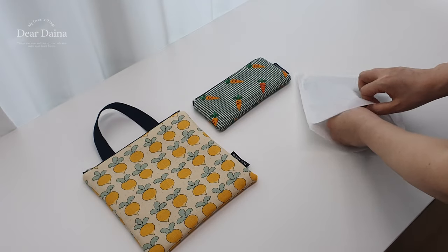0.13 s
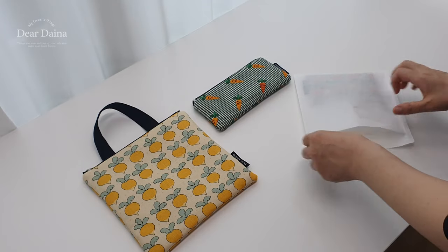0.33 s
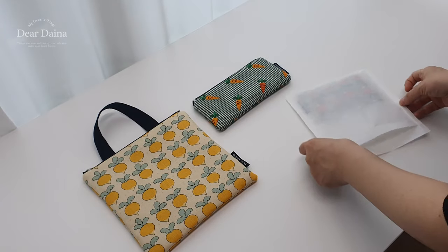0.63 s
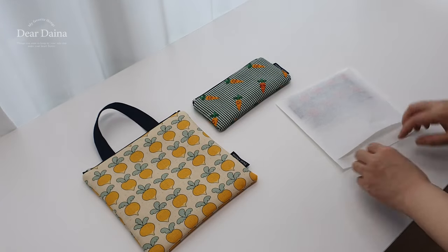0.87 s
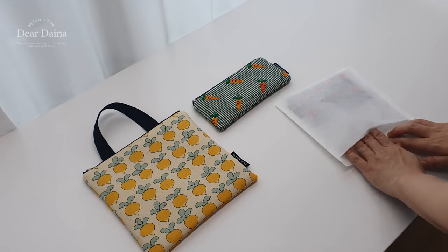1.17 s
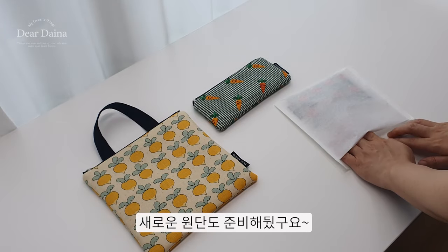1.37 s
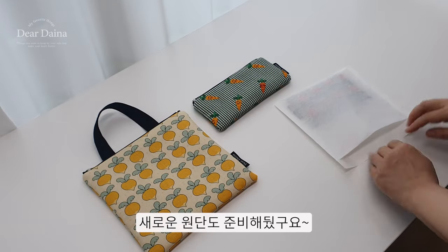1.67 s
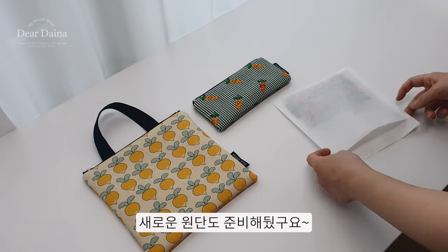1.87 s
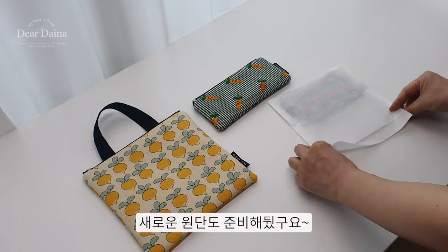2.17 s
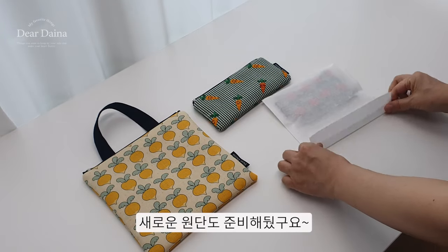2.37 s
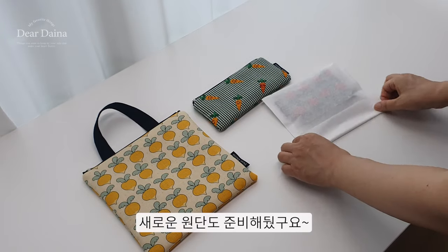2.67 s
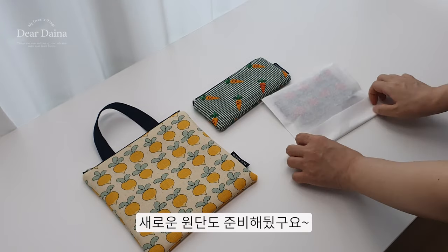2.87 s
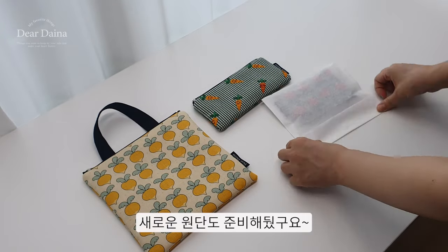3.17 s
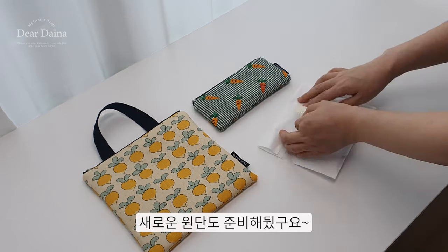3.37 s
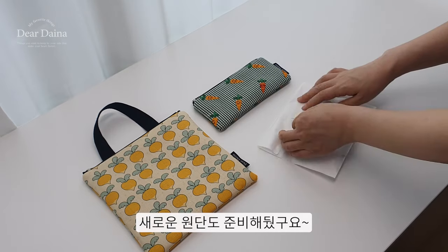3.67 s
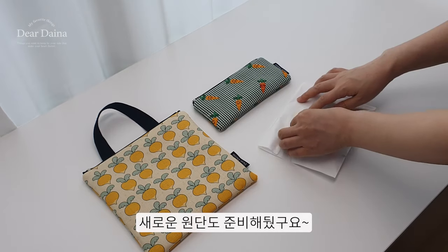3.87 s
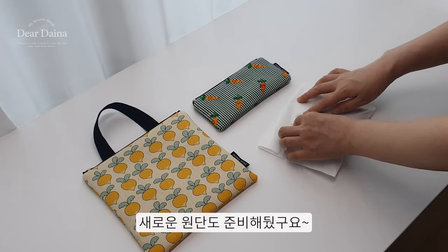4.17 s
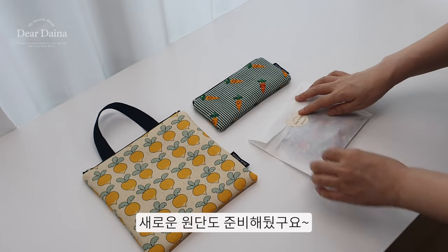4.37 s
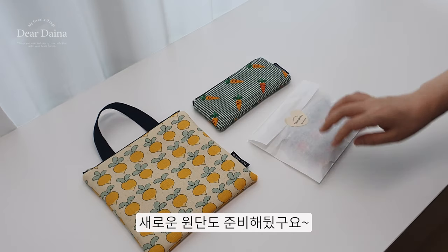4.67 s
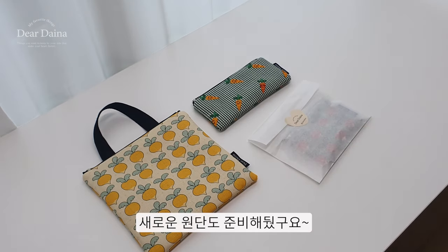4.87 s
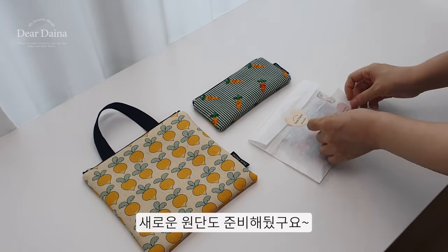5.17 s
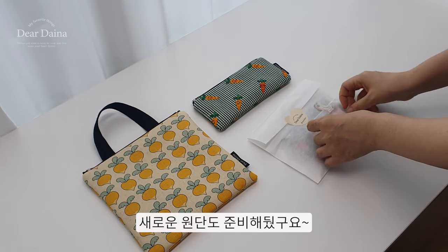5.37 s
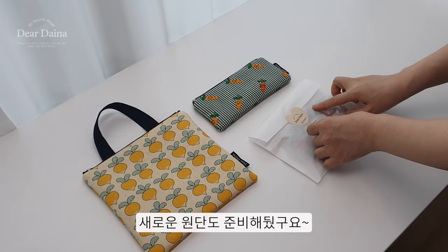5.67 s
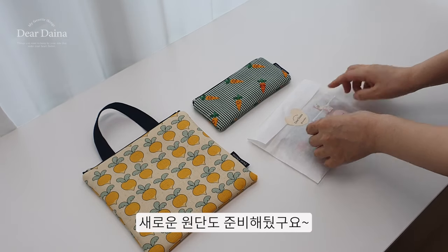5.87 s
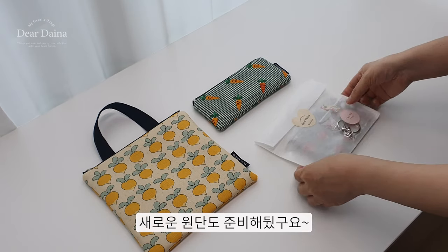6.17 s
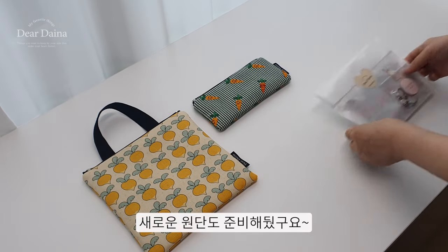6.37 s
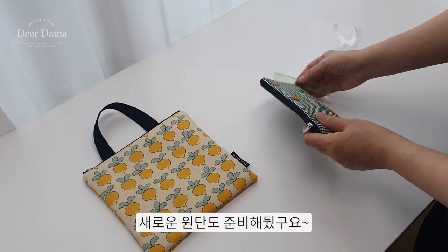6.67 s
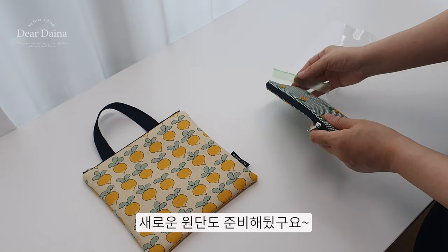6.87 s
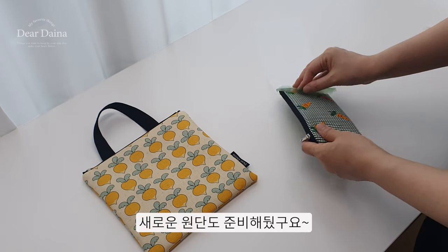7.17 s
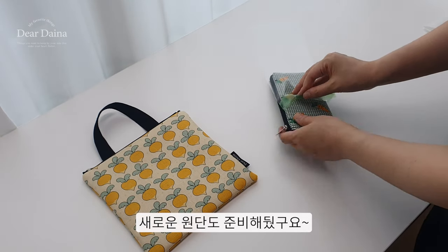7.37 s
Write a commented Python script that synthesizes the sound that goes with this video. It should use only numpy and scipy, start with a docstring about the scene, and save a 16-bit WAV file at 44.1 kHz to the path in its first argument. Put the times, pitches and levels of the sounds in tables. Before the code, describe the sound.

Crisp thin paper clicks, crackles and rustles under busy hands, slightly to the right. Early strong snaps give way to a dense run of folding crackles, a calmer stretch of small ticks and faint rubbing, and a final bright burst before light fabric-like scuffs. Dull taps sound on the table. Small dry indoor space, close microphones, soft room hiss, and low traffic rumble with a brief rising engine hum outside.

```python
"""Folding a stiff paper envelope

Hands fold a stiff glassine envelope shut on a table, press it flat, lift it away and pick up a fabric pouch.
The paper snaps and crumples in short clicks, and hisses in dense grains shaped by each push of the hand.
Fingers and the packet knock softly, with a scuff, a ringing table top and a low thump.
The room is small and dry, with a soft hiss of air; outside, traffic rumbles and one engine speeds up."""
import sys
import numpy as np
from scipy import signal
from scipy.fft import rfft, irfft
from scipy.io import wavfile
from scipy.ndimage import uniform_filter1d

SR = 44100
rng = np.random.default_rng(int(sys.argv[2]) if len(sys.argv) > 2 else 0)


def materialize(psi):
    """Save the field psi as 16-bit PCM at rate SR to the path in sys.argv[1].

    A 1-D psi becomes a single channel; in a 2-D psi each row is a channel.
    """
    bounded = np.clip(np.atleast_2d(psi).T, -1, 1)
    quanta = np.round(bounded * 32767).astype(np.int16)
    wavfile.write(sys.argv[1], SR, quanta)


N = 331191
TIME = np.arange(N) / SR


def amp(db):
    """Turns decibels into a gain."""
    return 10 ** (np.asarray(db) / 20)


def unit(x):
    """Scales to energy 1 along the last axis."""
    return x / np.sqrt(np.sum(x ** 2, -1, keepdims=True) + 1e-30)


def read(points, hz):
    """Reads a table between its points, on a log-frequency axis."""
    f, value = np.transpose(points)
    return np.interp(np.log(hz + 1e-6), np.log(f), value)


def curve(rows, column):
    """Reads one column of a time table at every sample."""
    rows = np.asarray(rows)
    return np.interp(TIME, rows[:, 0], rows[:, column])


def add(mix, s, sound):
    """Adds a sound into the mix from time s on, cutting off what falls outside."""
    start = round(s * SR)
    sound = sound[..., max(-start, 0):]
    part = mix[..., max(start, 0):][..., :sound.shape[-1]]
    part += sound[..., :part.shape[-1]]


def coloured(x, spectrum):
    """Gives a long signal a spectrum, at rms 1."""
    gain = amp(read(spectrum, np.fft.rfftfreq(N, 1 / SR)))
    return unit(irfft(rfft(x) * gain, N)) * np.sqrt(N)


def causal(gain):
    """Makes the sharpest click that has this magnitude spectrum (minimum phase)."""
    both_sides = np.r_[gain, gain[-2:0:-1]]
    log_gain = np.log(np.maximum(both_sides, 1e-6))
    return unit(np.fft.ifft(np.exp(np.conj(signal.hilbert(log_gain)))).real)


def at_microphones(x, lead=3):
    """The hands work to the right, so their sound reaches that side a few samples (lead) sooner."""
    left = np.r_[np.zeros(max(round(lead), 0)), x][:len(x)]
    return np.array([left, x])


# The paper buckling: t/s, crack level/dB, crumple level/dB (both energies), treble over body/dB
BUCKLES = [(.0031, -7.5, -12, -5), (0.0301, -28, -16, -20), (0.1809, -10, -12, -8.5),
           (0.1844, -6, -12, -10), (0.1983, -18, -9.5, -5), (.2612, -9.5, -21, -7.5), (.531, -31, -36, -5),
           (.667, -27, -21.5, -6), (0.693, -16, -7.5, -5.5), (0.7873, -31, -19, -13),
           (0.858, -29, -38, -28), (1.1046, -21.5, -28, 0), (1.1622, -19, -9.5, -9),
           (1.2093, -34, -13, -1.5), (1.2272, -27, -8.5, -4), (1.243, -20, -18, -18),
           (1.2725, -32, -21, -5), (1.2887, -34, -12, -1.5), (1.51, -23, -25.5, 1), (1.6327, -32, -20, -19),
           (1.6897, -33, -30, -27), (1.888, -30, -20.5, -11), (1.9622, -11.5, -7.5, -2),
           (2.0126, -14.5, -17, -4), (2.045, -24, -14, -13), (2.1024, -16, -15.5, -8),
           (2.1178, -26, -10.5, -21), (2.148, -24, -11.5, -15), (2.2189, -11, -13.5, -8),
           (2.2812, -11, -19, 4), (2.3011, -19, -6, -2), (2.4092, -21, -24, 0.5), (2.4495, -22.5, -28, 21),
           (2.6936, -22, -21.5, 5), (2.7509, -16.5, -12.5, -6), (2.795, -28, -12.5, 0),
           (2.842, -15, -10.5, -6), (2.879, -18, -35, -15), (2.897, -35, -16, 2), (2.9913, -23, -26, 1),
           (3.0158, -29, -13.5, 0), (3.0344, -26, -19, 4), (3.068, -17.5, -22, -4), (3.1315, -32, -15.5, 2),
           (3.1656, -16.5, -37, 21), (3.2776, -33, -23.5, -27), (3.3306, -17.5, -21.5, 4.5),
           (3.541, -34, -40, -10), (3.6173, -29.5, -36, -2), (3.702, -31, -42, -7), (3.766, -33, -47, -15),
           (3.843, -14.5, -24, -2), (3.9494, -16.5, -25, 8.5), (3.9685, -14.5, -27, 9),
           (4.0003, -16.5, -20.5, 5), (4.0702, -16, -15.5, -1.5), (4.1219, -24.5, -30, 2),
           (4.1291, -15.5, -24, -4.5), (4.1516, -19.5, -18, -1), (4.3135, -31, -32, 0),
           (4.3277, -19.5, -45, -2), (4.39, -26, -29, -12), (4.4266, -20.5, -40, -2),
           (4.4568, -18.5, -20.5, 3), (4.5248, -29, -28.5, -2), (4.914, -27.5, -28.5, -3.5),
           (5.402, -36, -20.5, 2), (5.4575, -22, -21, -1), (5.53, -14.5, -21, -0.5),
           (5.552, -23.5, -33, -18), (5.6532, -19.5, -25, -3), (5.7209, -12, -21, 2),
           (5.754, -16, -17.5, -5.5), (5.859, -31, -20.5, -1), (5.883, -12.5, -21.5, -3.5),
           (6.122, -20, -28, 2), (6.128, -10, -10, 0), (6.1355, -11.5, -12, -16), (6.1578, -6.5, -7.5, -3),
           (6.1719, -8.5, -11, -2), (6.216, -24, -14.5, 5), (6.4545, -28, -31.5, -3),
           (6.5425, -5.5, -24, 3.5), (6.546, -6, -18, -5.5), (6.7053, -29.5, -29, -8),
           (6.8758, -23, -26, -7), (6.8897, -14, -26, 3), (6.925, -28, -27, 9), (7.0082, -47, -30, 19),
           (7.047, -35, -28.5, 7), (7.095, -23, -28, 0), (7.1438, -23.5, -27.5, -2),
           (7.1994, -22.5, -32, -6), (7.272, -36, -28.5, -15), (7.424, -16.5, -19, -3.5)]
# How the sheet is held: from t/s, centre of the cracks f/Hz, lead of the right side/samples.
# In turn: filling the envelope, folding the flap, running down the crease, pressing it on the table,
# smoothing it and feeling for the edges, lifting it away, taking up the pouch
GRIPS = [(0, 3690, 3.42), (1.4, 4240, 4.3), (2.6, 4660, 3.45), (3.93, 2350, 2.62), (4.25, 3750, 1.6),
         (6, 4700, 3.52), (6.65, 3950, 1.65)]
# Body of a crack: frequency as a multiple of the centre, level/dB
CRACK_BODY = [(.04, -45.5), (.14, -20), (.5, -8.5), (.75, -2.5), (1.05, 1), (1.4, -4), (2.2, -15.5),
              (4, -40.5)]
# Treble of a crack: f/Hz, level/dB per Hz
CRACK_TREBLE = [(1000, -30), (4500, -7.5), (7500, 2), (11000, -1.5), (13500, -6), (16000, -14)]


def snaps(ripple_db=3.0, crumple_s=0.008, strain_s=0.0057, strain=0.66, spread_db=4,
          share=.13, smear_s=0.000504):
    """Each buckle is one crack, led by faint straining and followed by a dying shower of tiny creases."""
    out, hz = np.zeros((2, N)), np.fft.rfftfreq(1024, 1 / SR)
    t = np.arange(-1024, 2048) / SR
    straining = strain * np.exp(-abs(t) / strain_s)
    shower = np.where(t > .001, np.exp(-abs(t) / crumple_s), straining)
    for s, crack_db, crumple_db, treble_db in BUCKLES:
        _, centre_hz, lead = GRIPS[sum(s >= grip[0] for grip in GRIPS[1:])]
        body = unit(amp(read(CRACK_BODY, hz / centre_hz)))
        treble = amp(treble_db) * unit(amp(read(CRACK_TREBLE, hz)))
        gain = np.hypot(body, treble)
        # every facet of the sheet has resonances and a direction of its own
        wander = uniform_filter1d(rng.standard_normal((7, len(hz))), size=14)
        slowness, *ripples = unit(wander) * np.sqrt(len(hz))
        crack, *facets = [causal(gain * amp(ripple_db * ripple)) for ripple in ripples]
        facets = np.array([at_microphones(facet, lead + rng.standard_normal()) for facet in facets])
        # share is the chance of a crease per sample, split over the facets
        shape = (len(facets), 1, len(t))
        happens = rng.random(shape) < share / len(facets)
        sizes = rng.choice([-1, 1], shape) * amp(spread_db * rng.standard_normal(shape))
        creases = shower * happens * sizes
        crumple = unit(signal.fftconvolve(creases, facets, axes=2).sum(0))
        crack = dispersed(crack, smear_s * abs(slowness))
        add(out, s, amp(crack_db) * at_microphones(crack, lead))
        add(out, s + t[0], amp(crumple_db) * crumple)
    return out


def dispersed(click, delay_s):
    """Bending waves cross the sheet at different speeds, so each frequency arrives with its own delay."""
    phase = 2 * np.pi * np.cumsum(delay_s) * SR / len(click)
    return irfft(rfft(click) * np.exp(-1j * phase))


# Spectrum of the rustle: f/Hz, level/dB per Hz
RUSTLE_COLOUR = [(150, -14.5), (500, -9.5), (1200, 1), (2200, 0.5), (4000, 4), (6000, -1.5), (9000, -9),
                 (16000, -32)]
# Spectrum of the fine hiss: f/Hz, level/dB per Hz
HISS_COLOUR = [(2000, -31), (5000, -1), (7500, -0.5), (11000, 5), (13500, -3), (16000, -10)]


def sliding(grains_per_s=2500, spread_db=3.5, judder_db=5.5, crinkles_per_s=70, crinkle_share=0.62,
            crinkle_spread_db=3, rustle_db=-2.5, hiss_db=-4):
    """Fibres catch and let go in dense, clumped grains; now and then a small crease ticks."""
    signs = rng.choice([-1, 1], N)
    sizes = amp(spread_db * np.minimum(rng.exponential(1, N), 5))
    judder = unit(uniform_filter1d(rng.standard_normal(N), size=600)) * np.sqrt(N)
    catches = rng.random(N) < grains_per_s / SR
    fibres = unit(sizes * catches * amp(judder_db * judder))
    ticks = rng.random(N) < crinkles_per_s / SR
    crinkles = unit(ticks * amp(crinkle_spread_db * rng.standard_normal(N)))
    grains = signs * (fibres + crinkle_share * crinkles)
    rustling, hissing = pushes()
    rustle = coloured(grains, RUSTLE_COLOUR) * rustling * amp(rustle_db)
    hiss = coloured(grains, HISS_COLOUR) * hissing * amp(hiss_db)
    return from_the_hands(rustle + hiss)


# Paper sliding on paper, cloth and skin, one row per push of a hand:
# start t/s, length t/s, rustle level/dB, fine hiss level/dB (before the gains in sliding)
STROKES = [(0, 0.052, -56, -59), (0.167, 0.088, -43, -62), (0.561, 0.15, -54.5, -62.5),
           (0.658, 0.11, -52, -57), (1.108, 0.25, -53, -58.5), (1.585, 0.086, -51, -74),
           (1.871, 0.19, -60, -59), (2.114, .21, -51, -58.5), (2.423, 0.13, -57.5, -65.5),
           (2.648, 0.25, -58, -62), (2.933, 0.23, -58.5, -59.5), (3.276, 0.086, -62.5, -59.5),
           (3.5, 0.72, -69.5, -78), (3.938, 0.26, -62.5, -71), (4.246, 0.087, -59.5, -60),
           (4.375, 0.15, -66, -76), (4.8, 0.075, -58.5, -64.5), (4.898, 0.11, -70.5, -74),
           (5.108, .07, -66, -58), (5.383, 0.08, -55, -66), (5.52, 0.12, -66, -65), (5.702, .2, -77, -77),
           (6.102, 0.15, -49, -59), (6.262, .11, -62.5, -60.5), (6.37, 0.075, -67, -77),
           (6.613, 0.1, -60.5, -60), (6.883, 0.11, -64, -55), (7.096, 0.24, -63, -59.5),
           (7.235, 0.12, -66, -54.5)]
# The sheet between pushes: rustle level/dB, fine hiss level/dB (before the same gains)
RESTING_DB = (-77.5, -76)


def pushes(attack_s=0.01, release_s=0.022):
    """Every push of the hand builds up, holds, then dies away; the powers add."""
    power = np.ones((2, N)) * amp(RESTING_DB)[:, None] ** 2
    for start, length, *levels_db in STROKES:
        t = np.arange(0, length + 6 * release_s, 1 / SR)
        build_up = 1 - np.exp(-(t / attack_s) ** 2)
        push = build_up * np.exp(-np.maximum(t - length, 0) / release_s)
        add(power, start, (amp(levels_db)[:, None] * push) ** 2)
    return np.sqrt(power)


def from_the_hands(x):
    """Places a continuous sound wherever the hands are holding the sheet."""
    grip = np.searchsorted([start for start, _, _ in GRIPS[1:]], TIME)
    return sum(at_microphones(x * (grip == k), lead) for k, (_, _, lead) in enumerate(GRIPS))


# Hands and packet meeting the table: t/s, level/dB (before the gains of the three parts),
# low thump relative to it, level/dB, centre of the scuff f/Hz
KNOCKS = [(.453, -40, -18, 710), (0.469, -35, -13, 520), (0.791, -38.5, -4, 695), (1.816, -38.5, 0.5, 570),
          (2.303, -40.5, -1, 498), (2.888, -34.5, -4, 603), (2.911, -49, 4, 443), (2.993, -39.5, -1, 510),
          (3.295, -44.5, 1.5, 560), (3.532, -46.5, -24, 1500), (4.208, -40, -26, 910),
          (4.801, -52.5, -7, 555), (4.849, -42, -20, 1500), (6.035, -37, -25, 686), (6.04, -46.5, -12, 400),
          (6.155, -37.5, -17, 700), (6.657, -46.5, -12, 710), (6.701, -41, -15, 1020),
          (6.869, -39.5, -16, 970), (7.092, -41.5, -27, 1430), (7.155, -49.5, -8, 624)]
# Ringing of the table top: f/Hz, typical level/dB, time to fall by 60 dB t/s
TABLE_MODES = [(225, 9, 0.13), (280, 0.5, 0.16), (380.5, -4.5, 0.1), (447, -12, 0.23), (503, -3.5, 0.062),
               (550, 10.5, 0.023), (746, -14, 0.18), (946, 3, 0.044)]


def knocks(settle_s=0.0052, contact_s=0.014, touches_per_s=1400, place_db=2, octave_db=9.5,
           scuff_db=16, ring_db=2, thump_db=17, thump_hz=88, thump_s=0.027):
    """A soft, scuffing contact rings the table top and gives it a low push."""
    out, t, f = np.zeros(N), np.arange(8192) / SR, np.fft.rfftfreq(1024, 1 / SR)
    hz, mode_db, t60 = np.transpose(TABLE_MODES)[:, :, None]
    thump = unit(np.sin(2 * np.pi * thump_hz * t) * np.exp(-t / thump_s))
    contact = (1 - np.exp(-t / settle_s)) * np.exp(-t / contact_s)
    for s, level_db, low_db, scuff_hz in KNOCKS:
        octaves_away = abs(np.log2((f + 1) / scuff_hz))
        pad = causal(amp(-octave_db * octaves_away ** 1.29))
        happens = rng.random(len(t)) < touches_per_s / SR
        touches = rng.standard_normal(len(t)) * happens * contact
        scuff = unit(signal.fftconvolve(touches, pad)[:len(t)])
        # the place of the touch decides how strongly each mode answers
        decay = amp(mode_db + place_db * rng.standard_normal(hz.shape) - 60 * t / t60)
        modes = decay * np.sin(2 * np.pi * hz * t)
        ring = signal.fftconvolve(scuff, unit(modes.sum(0)))[:len(t)]
        knock = amp(scuff_db) * scuff + amp(ring_db) * ring + amp(thump_db + low_db) * thump
        add(out, s, amp(level_db) * knock)
    return at_microphones(out)


# First reflections, off the table and the hands: typical delay t/s, gain (before levelling the sum)
BOUNCES = [(.0011, 0.2), (.0027, 0.089), (.0042, 0.18)]


def bounced(x):
    """Near surfaces return each sound within a few milliseconds; the paths shift as the hands move."""
    out = x.copy()
    for delay_s, gain in BOUNCES:
        for channel in range(2):
            stretch = np.interp(TIME, np.linspace(0, TIME[-1], 30), rng.uniform(.8, 1.2, 30))
            delay = np.round(delay_s * stretch * SR).astype(int)
            out[channel] += gain * x[channel, np.maximum(np.arange(N) - delay, 0)]
    return out / np.sqrt(1 + sum(gain ** 2 for _, gain in BOUNCES))


# Extra lag of the left microphone in the middle range: f/Hz, lag/radians
LEFT_LAG = [(250, 0), (600, 1.51), (1200, 1.34), (2200, 0.77), (5000, 0), (9000, 0)]


def widened(x):
    """The microphone pair hears the middle range partly out of phase."""
    lag = read(LEFT_LAG, np.fft.rfftfreq(N, 1 / SR))
    left = irfft(rfft(x[0]) * np.exp(-1j * lag), N)
    return np.array([left, x[1]])


# How fast the room dies away: f/Hz, time to fall by 60 dB t/s
ROOM_DECAY = [(150, 0.032), (600, 0.093), (1500, 0.087), (4000, 0.086), (9000, 0.093), (16000, 0.095)]


def room(x, onset_s=0.00065):
    """Dense reflections, different at each microphone; their pattern drifts as the hands move."""
    out = np.zeros((2, N))
    for k in range(3):
        taps = rng.standard_normal((2, 16384)) * (rng.random((2, 16384)) < .2)
        hz, t, z = signal.stft(taps, SR, nperseg=256)
        decay = amp(-60 * t / read(ROOM_DECAY, hz)[:, None])
        tail = signal.istft(z * decay, SR, nperseg=256)[1]
        tail *= 1 - np.exp(-(TIME[:tail.shape[1]] / onset_s) ** 2)
        # three patterns blend into one another in a 1.7 Hz cycle
        place = np.sqrt(2 / 3) * np.cos(2 * np.pi * (1.7 * TIME + k / 3))
        out += signal.fftconvolve(x * place, unit(tail), axes=1)[:, :N]
    return out


# Background, used by street and air: t/s, street rumble level/dB, room air level/dB
# (before the gains in those functions)
BACKGROUND = [(0, -59, -67), (0.4, -64, -70.5), (1, -62.5, -70), (1.6, -66.5, -67), (2.5, -62, -66.5),
              (2.9, -60.5, -64), (3.37, -68, -68), (3.43, -66.5, -77.5), (4.2, -71, -80.5), (4.7, -72, -76),
              (5.4, -65.5, -74.5), (6.5, -62, -73), (6.8, -71, -79.5), (7.5, -67.5, -77)]
# Spectrum of the rumble: f/Hz, level/dB per Hz
RUMBLE_COLOUR = [(15, -27), (38, -4.5), (50, -12.5), (75, 6), (100, -6.5), (132, 3), (160, -12), (210, -27),
                 (400, -85)]
# The engine outside: t/s, firing rate f/Hz, level/dB (before wavering and left-right balance)
ENGINE = [(1.2, 107.5, -61), (1.45, 111.4, -62), (1.64, 113.2, -47.5), (1.76, 116.6, -47),
          (1.9, 119.3, -53.5), (2.05, 123.1, -48), (2.29, 131, -42.5), (2.42, 133.9, -64),
          (2.57, 141, -60.5), (2.7, 133, -86)]
# Tones of the engine: multiple of the firing rate, level/dB
ENGINE_ORDERS = [(.5, -15.5), (1, -0.5), (2, -34)]


def street(rumble_db=1.5, apart=0.22, waver_db=1, left_db=1.0, engine_left_db=2.0):
    """Only the bass of traffic and of one accelerating engine comes through the window."""
    noise = coloured(rng.standard_normal((2, N)), RUMBLE_COLOUR)
    common, side = noise * amp(curve(BACKGROUND, 1) + rumble_db)
    rumble = np.array([common + apart * side, common - apart * side]) * amp([[left_db], [-left_db]])
    turns = np.cumsum(curve(ENGINE, 1)) / SR
    tones = [amp(db) * np.sin(2 * np.pi * multiple * turns) for multiple, db in ENGINE_ORDERS]
    engine = np.sqrt(2) * sum(tones)
    waver = coloured(rng.standard_normal(N), [(12, -11.0), (40, -86)])  # f/Hz, level/dB per Hz
    passing = (TIME > ENGINE[0][0]) & (TIME < ENGINE[-1][0])
    fade = uniform_filter1d(passing * 1., size=2048)
    engine *= amp(curve(ENGINE, 2) + waver_db * waver) * fade
    return rumble + engine * amp([[engine_left_db], [-engine_left_db]])


# Spectrum of the room air: f/Hz, level/dB per Hz
AIR_COLOUR = [(20, -34), (200, 4.5), (300, 0), (520, 5), (750, -0.5), (1150, 3.5), (2000, -2.5), (5000, -7),
              (11000, -15), (13000, -34), (16000, -47)]


def air(level_db=4, apart=1.0):
    """The soft hiss of the room is shaped noise whose level varies and drops suddenly near 3.4 s."""
    noise = coloured(rng.standard_normal((2, N)), AIR_COLOUR)
    common, side = noise * amp(curve(BACKGROUND, 2) + level_db)
    return np.array([common + apart * side, common - apart * side])


def scene(snap_room_db=-5, slide_room_db=-3, knock_room_db=-6):
    """Paper and table sound in the room, over the street and the air."""
    paper, slide, table = snaps(), sliding(), knocks()
    into_room = amp(snap_room_db) * paper + amp(slide_room_db) * slide + amp(knock_room_db) * table
    echoes = room(into_room)
    direct = widened(bounced(paper + slide) + table)
    return direct + echoes + street() + air()


def record(dry, edge_hz=16200):
    """A low-pass filter takes away the highest treble, above the edge."""
    low_pass = signal.firwin(255, edge_hz, window=("kaiser", 8), fs=SR)
    return signal.oaconvolve(dry, low_pass[None], "same")


dry = scene()
out = record(dry)
materialize(out)
```